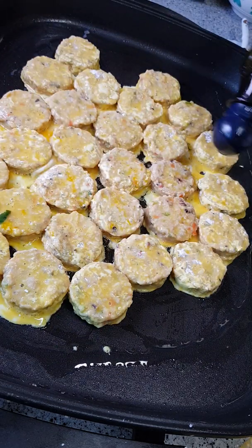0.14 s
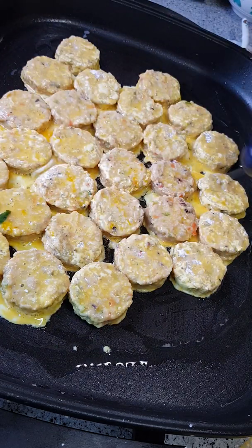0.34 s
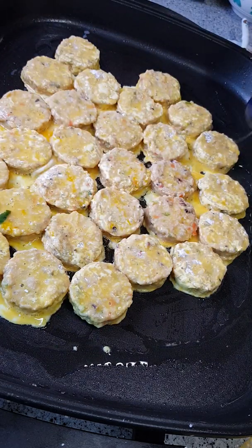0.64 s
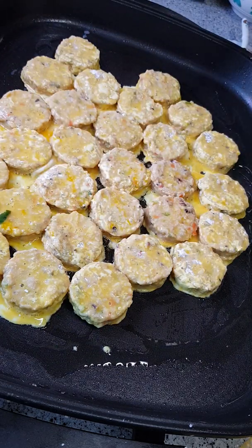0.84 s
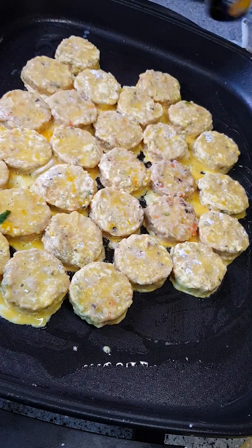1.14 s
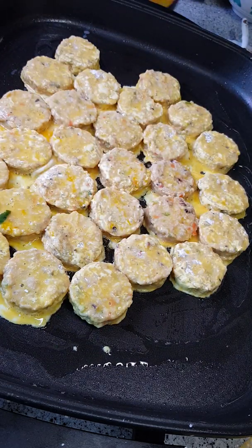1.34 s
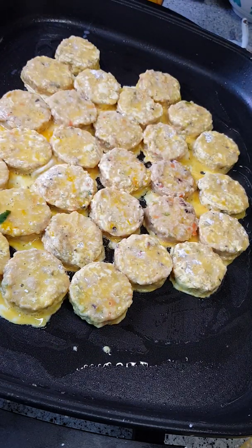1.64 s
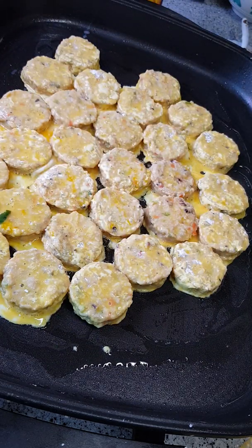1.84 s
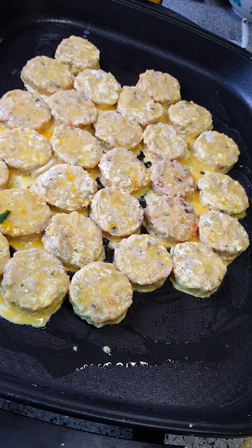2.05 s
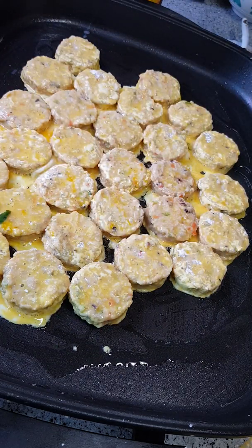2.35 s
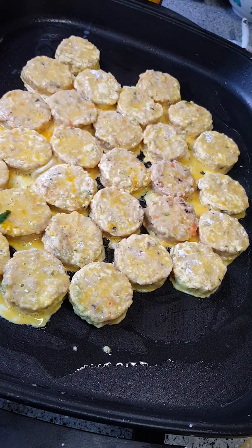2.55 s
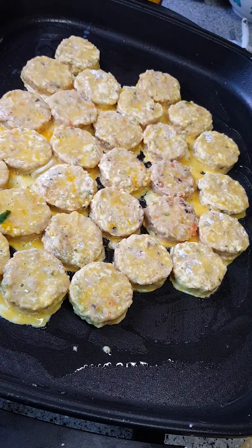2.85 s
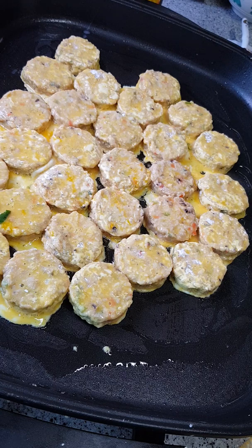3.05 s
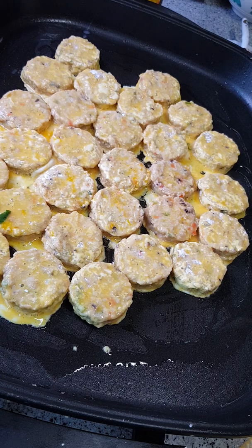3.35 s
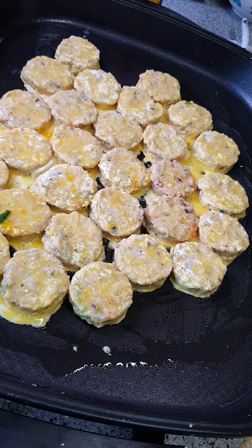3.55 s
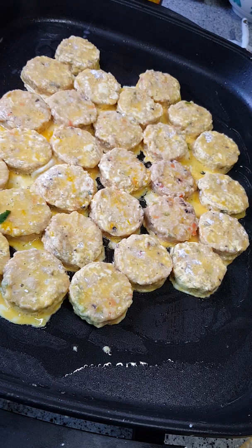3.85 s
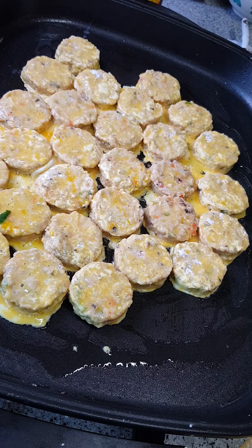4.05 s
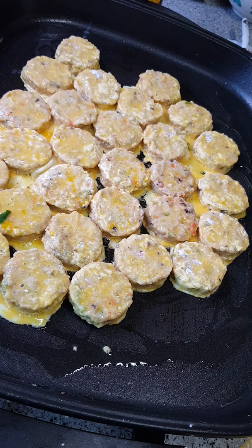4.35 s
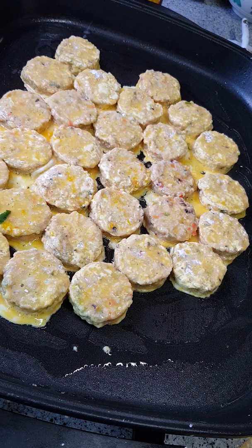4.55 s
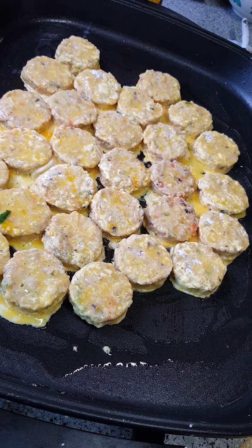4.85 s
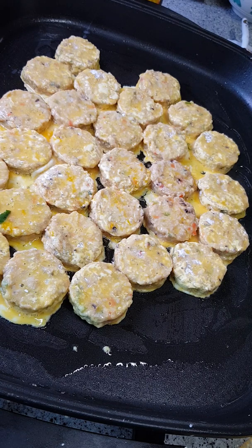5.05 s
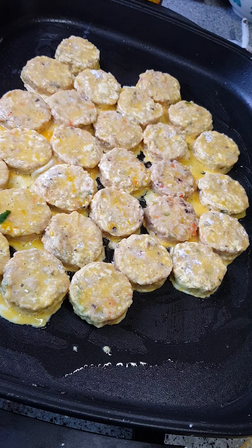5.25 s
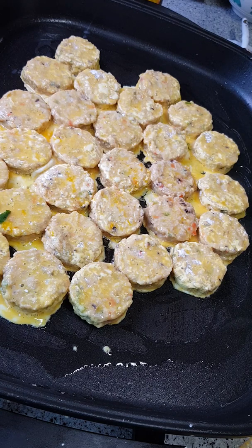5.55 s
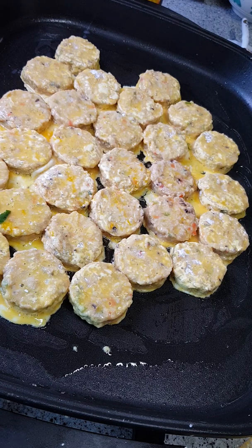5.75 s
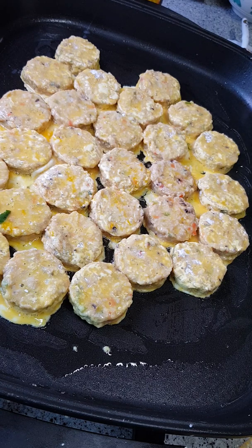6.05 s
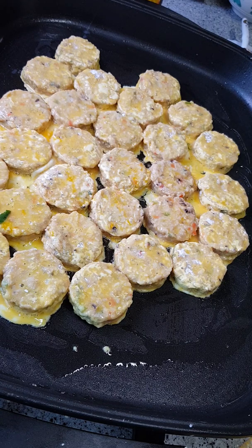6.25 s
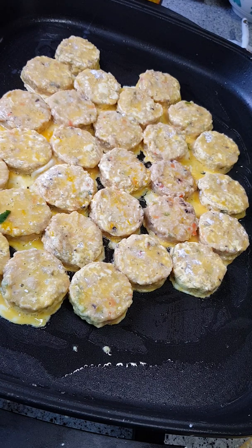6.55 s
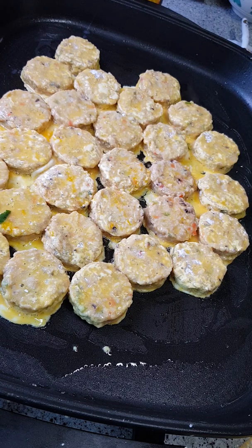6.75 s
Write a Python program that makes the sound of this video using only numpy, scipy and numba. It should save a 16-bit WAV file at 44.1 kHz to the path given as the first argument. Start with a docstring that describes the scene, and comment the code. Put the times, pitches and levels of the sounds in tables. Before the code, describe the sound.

Close by in a kitchen, a faint sizzle of frying oil runs under a click, a short scrape and a few knocks of things being set down, one of them hard and sharp. Bubbles then burst with bright ticks, and something is dragged again late on. Throughout, cloth rustles from side to side, the floor booms softly under someone's weight, and a small fan throbs with a thin whine.

```python
"""Pancakes frying on a kitchen floor

Small pancakes fry quietly in a wide pan: bubbles fizz in the oil and now and then one bursts and spits.
Beside the pan someone shifts about: cloth rustles left and right, things are dragged and set down,
and the floor booms under the moves. A small fan throbs and whines on the left.
Heard from close by, through two microphone ports a hand apart."""
import sys
import numpy as np
from scipy import signal
from scipy.fft import rfft, irfft, next_fast_len
from scipy.io import wavfile
from numba import njit

SR = 44100
rng = np.random.default_rng(int(sys.argv[2]) if len(sys.argv) > 2 else 0)


def transcribe(signal):
    """Save signal, clipped to [-1, 1], as a 16-bit WAV file at the path in sys.argv[1]."""
    frames = np.atleast_2d(signal).T
    limited = np.clip(frames, -1, 1)
    pcm = np.round(limited * 32767).astype(np.int16)
    wavfile.write(sys.argv[1], SR, pcm)


N = 303849
PORT_LAG = 20   # samples between the ports for a source at the side
# weight coming down on the floor: (time [s], strength [dB], pitch [Hz], t60 [s])
FLOOR_LOADS = [(0.283, -35, 72.5, 0.3), (0.405, -32.5, 72, 0.27), (0.489, -37, 76.5, 0.42),
               (0.825, -40, 71.8, 0.68), (1.531, -14.5, 89.7, 0.18), (1.572, -25, 110, 0.19),
               (1.797, -27.5, 64.5, 0.15), (1.978, -33, 60.4, 0.59), (2.061, -20.5, 105, 0.096),
               (2.328, -36, 56.6, 1), (2.392, -28.5, 60.2, 0.39), (2.913, -35.5, 69.4, 0.062),
               (3.995, -33.5, 60.4, 0.17), (4.911, -43.5, 93, 0.12), (5.91, -32, 124, 0.28),
               (6.561, -36, 66.4, 0.49), (6.862, -40, 61.4, 0.65)]


def from_db(db):
    """Decibels to gain."""
    return 10 ** (np.asarray(db) / 20)


def rms_one(x):
    """Scale to rms 1."""
    return x / np.sqrt(np.mean(x ** 2) + 1e-20)


def butter(x, order, hz, kind):
    """Butterworth filter."""
    return signal.sosfilt(signal.butter(order, hz, kind, fs=SR, output="sos"), x)


def band(x, low_hz, high_hz):
    """Band-pass to rms 1."""
    return rms_one(butter(x, 3, [low_hz, high_hz], "band"))


def in_time(rows):
    """Columns of a curve table, one value a sample."""
    s, *columns = np.transpose(rows)
    return [np.interp(np.arange(N) / SR, s, c) for c in columns]


def at_hz(points, hz):
    """Read a spectrum on a log axis."""
    points_hz, values = np.transpose(points)
    return np.interp(np.log(hz), np.log(points_hz), values)


def drift(rate_hz):
    """Smooth random wander of spread 1."""
    r = np.exp(-80 * np.pi * rate_hz / SR)
    slow = signal.lfilter([1], [1, -2 * r, r * r], rng.standard_normal(N // 40 + 2002))[2000:]
    return np.interp(np.arange(N) / 40, np.arange(len(slow)), rms_one(slow))


def coloured(x, spectrum, low_hz, high_hz, peaks):
    """Shape by a spectrum and resonances, soft-edged between two frequencies; rms 1."""
    size = next_fast_len(N)
    hz = np.arange(1, size // 2 + 2) * SR / size
    edges = 1 / np.sqrt((1 + (low_hz / hz) ** 8) * (1 + (hz / high_hz) ** 8))
    lift_db = sum(db / (1 + (2 * (hz - centre) / width) ** 2) for centre, width, db in peaks)
    gain = from_db(at_hz(spectrum, hz) + lift_db) * edges
    return rms_one(irfft(rfft(x, size) * gain, size)[..., :N])


def grains(per_s, spread_db):
    """Random clicks of uneven size."""
    sizes = from_db(spread_db * np.minimum(rng.exponential(1, N), 5)) * rng.choice([-1, 1], N)
    return sizes * (rng.random(N) < per_s / SR)


def placed(x, side_db, lag=0):
    """Mono or stereo at the ports: the left louder by side_db and later by lag samples."""
    left, right = np.broadcast_to(x, (2, x.shape[-1]))
    return np.array([np.roll(left, max(lag, 0)) * from_db(side_db / 2),
                     np.roll(right, max(-lag, 0)) * from_db(-side_db / 2)])


def add(out, s, sound):
    """Mix a short stereo sound in at a time."""
    at = round(s * SR)
    out[:, at:at + sound.shape[1]] += sound[:, :N - at]


def alike_below(x, hz):
    """Long waves reach both ports alike: the bass leaves the difference."""
    side = butter((x[0] - x[1]) / 2, 1, hz, "high")
    return x.mean(axis=0) + side * [[1], [-1]]


@njit
def moving_resonance(x, hz, width, sr):
    """A resonance whose centre follows hz; width is a share of the centre."""
    out = np.zeros(len(x))
    for i in range(2, len(x)):
        r = np.exp(-np.pi * width * hz[i] / sr)
        push = np.sqrt(1 - r * r) * (x[i] - x[i - 2])
        out[i] = push + 2 * r * np.cos(2 * np.pi * hz[i] / sr) * out[i - 1] - r * r * out[i - 2]
    return out


def rustle_and_fizz():
    """Cloth and frying oil: five noise bands follow the moves, part direct, part from all round."""
    # someone moving by the pan: (time [s], rustle [dB], top band's lift [dB], left over right [dB])
    moves = [(0.0, -67.5, 7, -2), (0.08, -77.5, 2, 5), (0.27, -73, 4, -0.5), (0.45, -69, -0.5, 6),
             (0.98, -64.5, 1, 4.5), (1.5, -64, 1, 5), (2.1, -60.5, 2, 2), (2.75, -64.5, 0, 6),
             (3.27, -62.5, 0.5, 1.5), (3.45, -55.5, 2, -0.5), (3.6, -59.5, -1, 3.5),
             (3.8, -61.5, -4.5, 3.5), (4.1, -66.5, 0, 4.5), (4.8, -66, -0.5, 3.5), (5.33, -62, 1.5, 0),
             (5.45, -57.5, 2, -1.5), (5.93, -56, 5, -0.5), (6.1, -61.5, 6.5, -1), (6.54, -58.5, -4, -1.5),
             (6.75, -71, 5, 3), (6.89, -56.5, -4, -3.5)]
    # noise bands: (from [Hz], to [Hz], level [dB], rustle followed [share], flicker [dB], rate [Hz])
    registers = [(10, 175, -59.5, 0.58, 8.5, 5.3), (149, 1780, -57.5, 0.25, 3, 27),
                 (954, 3870, -60, 0.98, 2.5, 17), (3200, 6240, -63.5, 0.96, 4.5, 22),
                 (6660, 53000, -62, 0.47, 3.5, 8.4)]
    # colour within the bands: (frequency [Hz], density [dB])
    spectrum = [(21, -39), (35, -5), (65, -5.5), (114, -9.5), (144, -16.5), (212, -9.5), (329, -20.5),
                (437, -2.5), (832, -4.5), (1190, -14), (1800, -15.5), (8020, -16), (11500, -13.5),
                (15300, -16.5), (16500, -81)]
    # resonances on the way to the microphone: (centre [Hz], width [Hz], lift [dB])
    resonances = [(345.5, 110, 11.5), (629, 67, 7.5), (1820, 19, 9), (2590, 890, 5), (3340, 170, -2),
                  (5300, 420, 2), (6400, 380, -1), (8540, 2600, 7)]
    # sound reaching the ports straight: (frequency [Hz], power [share])
    direct_shares = [(90, 1), (400, 0.85), (2500, 0.0044), (11000, 0.0086)]
    share_hz, share = np.transpose(direct_shares)
    share = np.clip(share, .01, .99)
    direct_over_diffuse = np.column_stack([share_hz, 10 * np.log10(share / (1 - share))])
    rustle_db, treble_db, side_db = in_time(moves)
    left_share = np.clip(.5 + side_db / 7.4, 0, 1)
    fizz = rms_one(grains(per_s=2600, spread_db=1.8))   # tiny bubbles bursting in the oil
    out = 0
    for low, high, level_db, follows, flicker_db, rate_hz in registers:
        level_db = level_db + follows * (rustle_db - rustle_db.mean()) + treble_db * (low > 4000)
        if low < 50:
            level_db = floor_rumble_db(level_db)
        left, right, *diffuse = rng.standard_normal((4, N))
        from_left = np.sqrt(left_share) * placed(left + 0.09 * fizz * (low > 700), 0, -PORT_LAG)
        from_right = np.sqrt(1 - left_share) * placed(right, 0, PORT_LAG)
        direct_gain = from_db(at_hz(direct_over_diffuse, np.sqrt(max(low, 60) * high))) ** .5
        arriving = direct_gain * (from_left + from_right) + np.array(diffuse)
        noise = coloured(arriving, spectrum, low, high, resonances)
        gain = from_db(level_db + flicker_db * np.tanh(drift(rate_hz)))
        lean_db = side_db * np.clip(low / 1000, .25, 1)   # long waves reach both ports more alike
        out = out + placed(gain * noise, lean_db)
    return out


def fan(turns_per_s=23, crest_s=2.9, throb_depth=0.43, motor_hz=1280):
    """A small fan off to the left: its hiss swells once a turn and its motor whines thinly."""
    # the fan's hiss: (time [s], level [dB])
    hiss_curve = [(0, -74), (2.2, -61), (2.9, -61), (3.4, -63.5), (6.89, -79)]
    # motor tones: (harmonic [number], level [dB])
    harmonics = [(8, -72), (9, -73.5)]
    t = np.arange(N) / SR
    throb = 1 + throb_depth * np.cos(2 * np.pi * turns_per_s * (t - crest_s) + .5 * drift(4.0))
    air = butter(rng.standard_normal(N), 2, [3800, 6800], "band")
    hiss = from_db(in_time(hiss_curve)[0]) * rms_one(throb * air)
    whine = sum(from_db(db + 0.86 * drift(1.4)) * np.sin(2 * np.pi * k * motor_hz * t + k * k)
                for k, db in harmonics)
    return placed(hiss, 7.2, -PORT_LAG) + placed(whine, 4.5, -PORT_LAG)


def drags(sag_db_per_s=12.5, release_db_per_s=429, sink_octaves_per_s=15.6, rub_lag_s=.022):
    """Things dragged close by: uneven slips excite a hollow body and squeaks, with rasp and hiss."""
    # strokes: (time [s], rise [s], hold [s], body level [dB], body from [Hz], to [Hz],
    # squeak, rasp and hiss against the body [dB], left over right [dB])
    strokes = [(0.275, 0.0057, 0.019, -48, 2740, 2820, -13, -7.5, -11, 12.5),
               (0.32, 0.0072, 0.082, -52.5, 2650, 2660, -12, -18, -29, 1),
               (0.754, 0.0017, 0.0066, -33, 1270, 1100, 9, -23, -33, 5.5),
               (0.764, 0.0054, 0.048, -32, 1020, 490, -16, -19, -9, 0),
               (0.804, 0.0025, 0.0074, -42.5, 700, 614, -18, -5.5, -18, -21),
               (0.838, 0.013, 0.015, -36.5, 325, 426, 0.5, -8, 5, 9),
               (0.873, 0.0011, 0.0073, -35.5, 2200, 2900, -13.5, -8, -4.5, -4),
               (.895, 0.028, 0.011, -64, 500, 400, -15, -10, 13, 0),
               (4.904, 0.01, 0.12, -52, 800, 860, -9, -4.5, -1, -3),
               (5.41, 0.015, 0.06, -49.5, 480, 400, -12, -17, -11, 0),
               (5.585, 0.021, 0.015, -57, 900, 830, -3, 3.5, 6.5, -5),
               (5.685, 0.014, 0.14, -58.5, 726, 1100, -2, 3.5, 7, -4),
               (5.8137, 0.0011, 0.024, -34.5, 585, 726, -5, -11, -8.5, -1),
               (5.833, 0.016, 0.02, -27.5, 685, 650, -23, -19, -14, -2),
               (5.876, 0.0018, 0.082, -31.5, 700, 565, -10, -7.5, -6, -2),
               (5.967, 0.051, 0.033, -42.5, 610, 740, 0, 1.5, 5.5, -2)]
    # resonances of the dragged thing: (frequency [Hz])
    squeaks_hz = [1150, 1600, 1900, 2300]
    out, t = np.zeros((2, N)), np.arange(SR // 2) / SR
    slips = rms_one(grains(per_s=3000, spread_db=2.0) * from_db(3.5 * drift(70)))
    own_slips = np.array([np.roll(slips, N // 3), np.roll(slips, -N // 3)])   # heard by one port only
    slips = rms_one(slips + 0.98 * own_slips)
    low_rub = band(signal.lfilter([1], [1, -.8], slips), 130, 2880)
    dust = rms_one(grains(per_s=3700, spread_db=3.0)) + rng.standard_normal((2, N))
    dust *= from_db(1.8 * drift(36))
    rasp, hiss = band(dust, 3900, 7500), band(dust, 8200, 19500)
    resonators = [signal.iirpeak(hz, hz / 130, fs=SR) for hz in squeaks_hz]   # each 130 Hz wide
    squeak = band(sum(signal.lfilter(b, a, slips[:, ::-1]) for b, a in resonators), 810, 2340)
    late = np.exp(-1 / (rub_lag_s * SR))   # the low rub trails the pressure
    for s, rise, hold, body_db, from_hz, to_hz, squeak_db, rasp_db, hiss_db, side_db in strokes:
        during = round(s * SR) + np.arange(len(t))
        held_s, released_s = np.clip(t - rise, 0, hold), np.clip(t - rise - hold, 0, 1)
        fall_db = sag_db_per_s * held_s + release_db_per_s * released_s
        press = np.clip(t / rise, 0, 1) * from_db(body_db - fall_db)
        hz = from_hz * (to_hz / from_hz) ** np.clip(t / (rise + hold), 0, 1)
        hz /= 2 ** (sink_octaves_per_s * np.minimum(released_s, .1))
        narrow = [moving_resonance(port[during], hz, 0.24, SR) for port in slips]
        body = rms_one(np.array([moving_resonance(port, hz, 0.8, SR) for port in narrow]))
        rub = 0.58 * signal.lfilter([1 - late], [1, -late], press) * low_rub[:, during]
        scrape = (from_db(squeak_db) * squeak[:, during] + from_db(rasp_db) * rasp[:, during]
                  + from_db(hiss_db) * hiss[:, during])
        lag = PORT_LAG if side_db < 0 else -PORT_LAG
        add(out, s, placed(press * (body + scrape) + rub, side_db, lag))
    return out


def knocks(contact_s=0.00062, rattle_t60_s=0.056):
    """Things set down: the harder the contact, the higher the modes it rings; a crack rides on top."""
    # contacts: (time [s], body peak [dB], hardness [octaves above 400 Hz], crack peak [dB],
    # left over right [dB])
    contacts = [(0.278, -44, 0.44, -42, 3), (0.7485, -25.5, 4.05, -37.5, -2.5),
                (1.534, -15.5, 0.86, -36, 5.5), (1.546, -27.5, 2.46, -33.5, -1),
                (1.711, -38.5, 1.33, -46, 8), (1.794, -36, 1.1, -46, -8), (1.979, -27.5, 1.46, -32, 6),
                (2.063, -6, 3.18, -10, 3), (2.067, -10.5, 2.7, -17, -1), (2.32, -33, 1.14, -61, 2),
                (2.379, -36.5, 0.27, -56, 4), (3.106, -39, 2.5, -58, 3), (5.8775, -21.5, 3, -46, 0),
                (5.8135, -25.5, 2.87, -29, -4.5)]
    # modes of the struck board: (frequency [Hz], level [dB], t60 [s])
    modes = [(162.8, -5, 0.0705), (303.7, -6.5, 0.13), (482.5, -13.5, 0.089), (576, -2, 0.039),
             (804, -14, 0.1), (841, -6.5, 0.046), (1380, 7, 0.012), (1630, -32, 0.05), (2110, 5.5, 0.011),
             (2700, -6, 0.022), (3136, 7.5, 0.018)]
    out, t = np.zeros((2, N)), np.arange(9000) / SR
    draws = rng.standard_normal((len(contacts), 2, len(modes) + len(t)))
    for (s, peak_db, hardness, crack_db, side_db), draw in zip(contacts, draws):
        rattle = draw[:, len(modes):] * from_db(-60 * t / rattle_t60_s)
        body = from_db(9) * alike_below(rattle, 900)
        for k, (hz, level_db, t60) in enumerate(modes):
            port_phase = hz / 3000 * draw[:, k:k + 1]
            # loose contact blurs each mode: its phase takes random steps
            blur = 4e-5 * hz * np.cumsum(np.roll(draw[0], 700 * k))[:len(t)]
            swing = np.sin(2 * np.pi * hz * t + port_phase + blur)
            body += swing * from_db(level_db + 2 * draw[0, k] - 60 * t / t60)
        body = butter(body * np.clip(t / contact_s, 0, 1), 4, 400 * 2 ** hardness, "low")
        crack = butter(rattle, 2, [2500, 10000], "band")
        body *= from_db(peak_db) / np.abs(body).max()
        crack *= from_db(crack_db) / np.abs(crack).max()
        add(out, s, placed(body + crack, side_db))
    return out


def floor_booms(rise_s=0.005):
    """The floor gives under weight and rings low, with an overtone that dies sooner."""
    out, t = np.zeros((2, N)), np.arange(22000) / SR
    rise = 1 - np.exp(-t / rise_s)
    for s, strength_db, hz, t60 in FLOOR_LOADS:
        boom = np.sin(2 * np.pi * hz * t) * from_db(-60 * t / t60)
        overtone = 0.14 * np.sin(2 * np.pi * 1.665 * hz * t) * from_db(-60 * t / (0.33 * t60))
        add(out, s, placed(from_db(strength_db) * rise * (boom + overtone), side_db=2))
    return out


def floor_rumble_db(calm_db, wake_db=-14, t60_s=0.88):
    """Level of the floor's rumble: a calm level and a dying wake after every boom."""
    t = np.arange(N) / SR
    wake_power = sum((t > s) * from_db(2 * (db + wake_db - 60 * np.abs(t - s) / t60_s))
                     for s, db, _, _ in FLOOR_LOADS)
    return 10 * np.log10(from_db(2 * calm_db) + wake_power)


def oil_spits(wall_echo_s=.001, wall_loss_db=3):
    """A bubble bursts: a click of a few cycles, its echoes between the pan walls, a fine splash."""
    # bursting bubbles: (time [s], peak [dB], brightness [Hz], left over right [dB])
    bubbles = [(0.476, -37, 10200, 2), (1.1738, -34, 11200, 13), (1.717, -23.5, 5700, 6),
               (1.778, -35, 12500, 6.5), (1.93, -34.5, 9740, 17), (2.998, -27.5, 11100, -2),
               (3.3923, -25, 10900, -2), (3.5761, -18.5, 10800, -4), (3.9893, -15, 10400, -1),
               (4.2119, -17, 10400, -1), (4.2576, -25, 11400, -3), (5.5204, -22, 11300, -4),
               (5.984, -17, 9700, -2), (6.554, -25, 10900, -1), (6.692, -14, 9900, 0.1),
               (6.783, -33, 11100, 5)]
    out, t = np.zeros((2, N)), np.arange(3000) / SR
    splash_decay = from_db(-6 - 60 * t / 0.026) + from_db(-27 - 60 * t / 0.056)   # spray, faint tail
    splashes = rng.standard_normal((len(bubbles), 2, len(t)))
    click = 4   # height against the splash noise
    for (s, peak_db, hz, side_db), noise in zip(bubbles, splashes):
        burst = noise * np.clip(t / 0.0028, 0, 1) * splash_decay
        burst[:, 0] = click
        for bounce in range(1, 5):
            at = round(bounce * wall_echo_s * SR * (1 + 0.032 * noise[0, bounce]))
            echo_db = -9 - wall_loss_db * bounce + 2 * noise[:, bounce]
            burst[:, at] += click * (-1) ** bounce * from_db(echo_db)
        bright = butter(burst, 3, [0.738 * hz, 1.29 * hz], "band")
        spit = bright + from_db(-2) * butter(burst, 1, 7000, "high")
        add(out, s, placed(from_db(peak_db) * spit / np.abs(spit).max(), side_db))
    return out


def kitchen_echoes(x, t60_s=0.28, wall_cut_hz=7900, first_echo_s=0.0007):
    """Each port hears dense echoes of its own off the walls; the treble dies sooner."""
    t = np.arange(SR // 2) / SR
    noise = rng.standard_normal((2, len(t))) * np.clip(t / first_echo_s - 1, 0, 1)
    dull = butter(noise, 1, wall_cut_hz, "low")
    echoes = dull * from_db(-60 * t / t60_s) + (noise - dull) * from_db(-60 * t / (0.64 * t60_s))
    wet = signal.fftconvolve(x.mean(axis=0, keepdims=True), rms_one(echoes) / np.sqrt(len(t)), axes=1)
    return alike_below(wet[:, :N], 750)


def scene():
    """Knocks, drags and spits with the kitchen around them, over floor, cloth, fizz and fan."""
    knocked, dragged, spits = knocks(), drags(), oil_spits()
    to_walls = knocked + from_db(-2.5) * dragged + from_db(0.5) * spits   # drags are close: less room
    room = from_db(-4.5) * kitchen_echoes(to_walls)
    return knocked + dragged + spits + room + floor_booms() + rustle_and_fizz() + fan()


def record(dry, port_dip_hz=7700, low_cut_hz=44, low_pass_hz=15800):
    """The microphone dips the treble and loses the deepest bass; then a steep low-pass cuts the top."""
    notched = signal.lfilter(*signal.iirnotch(port_dip_hz, Q=5.0, fs=SR), dry)
    heard = butter((dry + notched) / 2, 4, low_cut_hz, "high")
    return signal.sosfilt(signal.ellip(12, .5, 70, low_pass_hz, fs=SR, output="sos"), heard)


dry = scene()
out = record(dry)
transcribe(out)
```